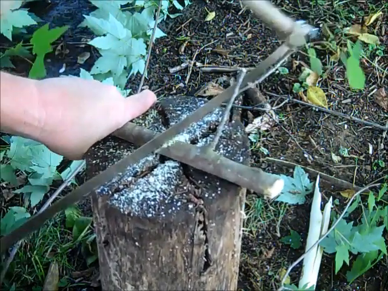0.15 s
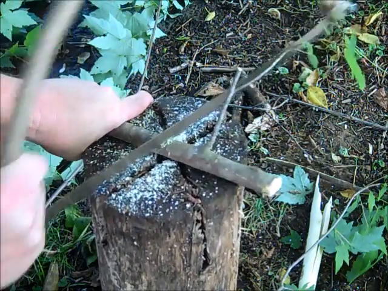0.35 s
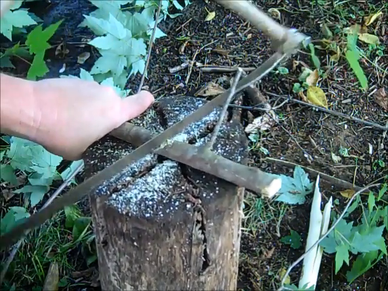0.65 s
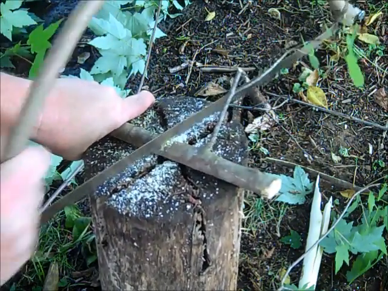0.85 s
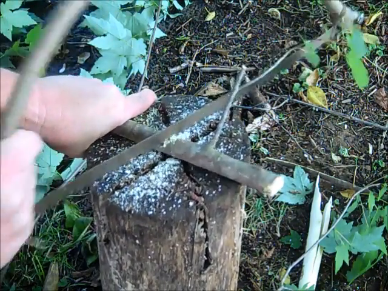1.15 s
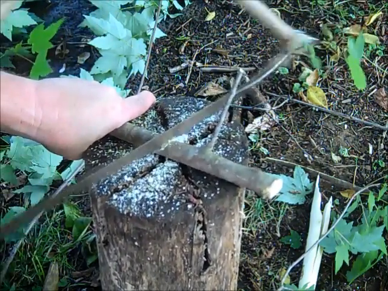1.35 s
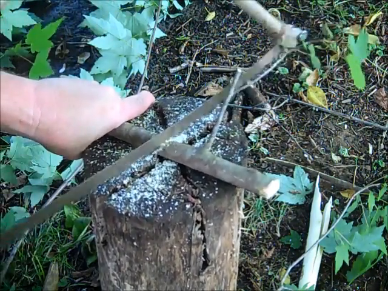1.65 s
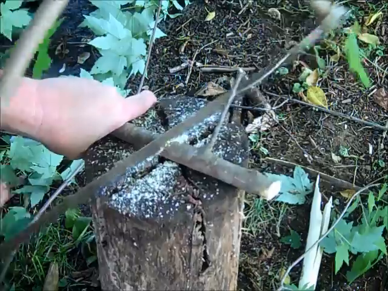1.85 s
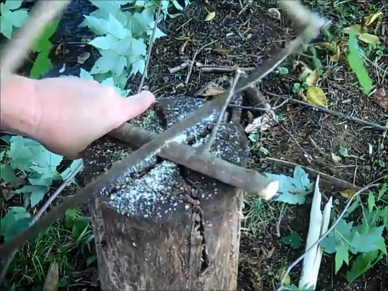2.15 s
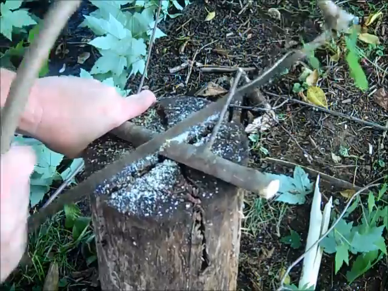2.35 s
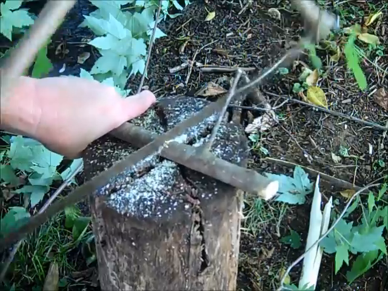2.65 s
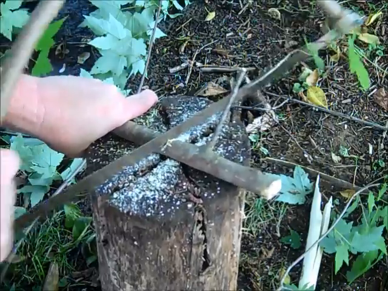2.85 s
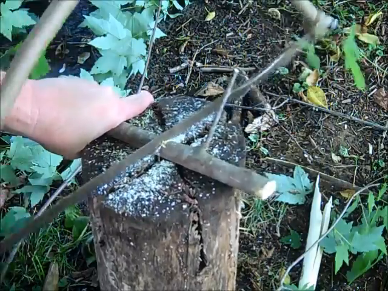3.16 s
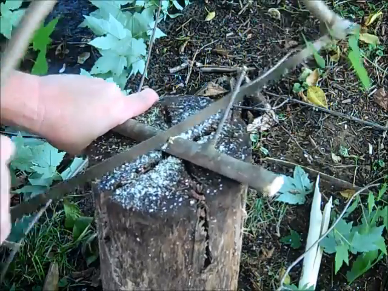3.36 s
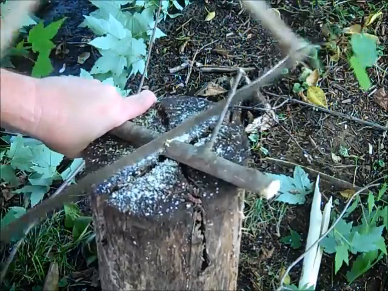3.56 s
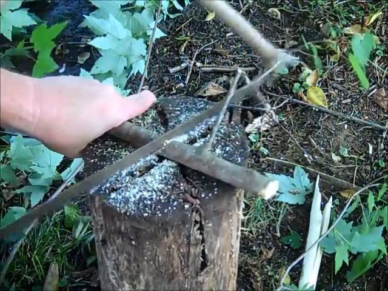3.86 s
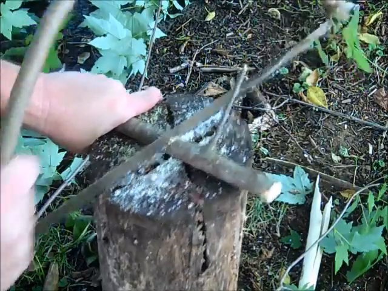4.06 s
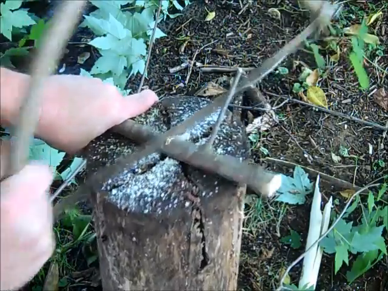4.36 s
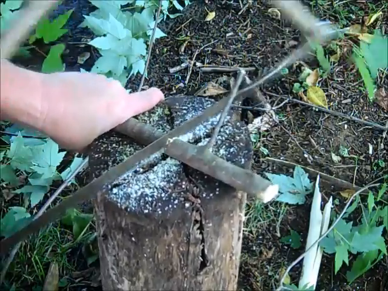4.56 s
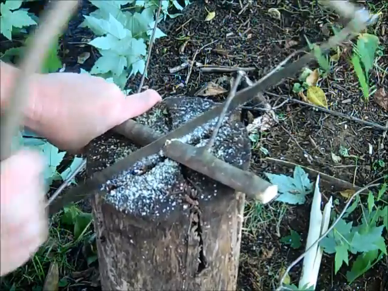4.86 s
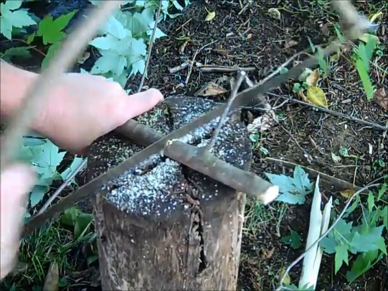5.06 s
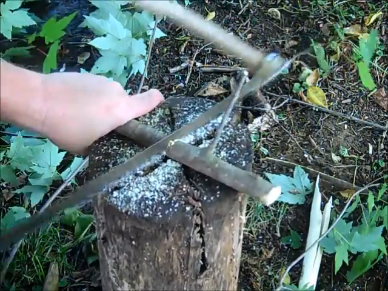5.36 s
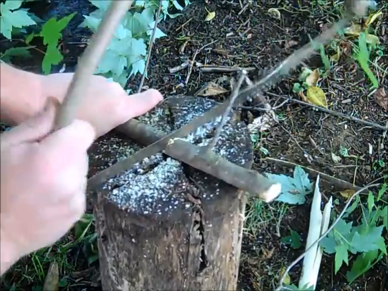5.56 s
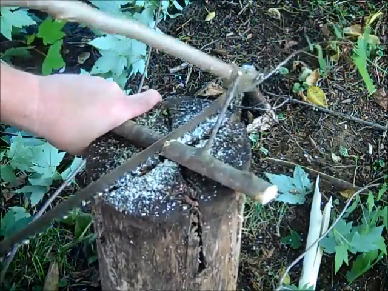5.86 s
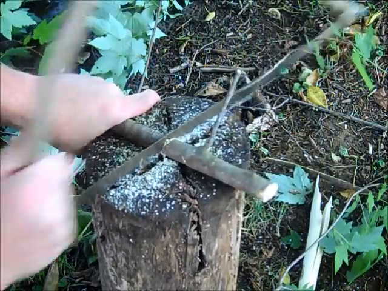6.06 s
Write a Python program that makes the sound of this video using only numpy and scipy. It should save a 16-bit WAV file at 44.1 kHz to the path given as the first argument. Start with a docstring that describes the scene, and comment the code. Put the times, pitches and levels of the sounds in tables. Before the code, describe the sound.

A hand bow saw cuts a stick held on a stump, recorded at arm's length in stereo. Quiet, short pulls alternate with louder, swelling pushes, all crisp, gritty and fibrous. The stick honks nasally, the stump adds faint low body, and small hollow knocks and a faint steel ring come through. Strokes quicken and strengthen, then slow and lengthen towards the end. Outdoors, almost dry, with very quiet air.

```python
"""Outdoors, a bow saw cuts a stick held down on a stump, an arm's length from a pair of microphones.
Light pulls alternate with heavy pushes. Teeth tear crackling fibres out of shaped noise, some biting deep;
the same force makes the stick honk, the stump resonate and the steel blade ring faintly through the turns.
The stick also knocks on the stump and the blade squeaks, as short decaying or swelling notes.
Behind it lie a thin scattered tail and still air, made of noise."""
import sys
import numpy as np
from scipy import signal
from scipy.fft import rfft, irfft, next_fast_len
from scipy.io import wavfile
from scipy.ndimage import uniform_filter1d, map_coordinates

SR = 44100
rng = np.random.default_rng(int(sys.argv[2]) if len(sys.argv) > 2 else 0)


def bounce(signal):
    """Save signal as a 16-bit WAV file at the path given by the first command-line argument."""
    frames = np.transpose(np.atleast_2d(signal))
    limited = np.clip(frames, -1, 1)
    pcm = np.round(limited * 32767).astype(np.int16)
    wavfile.write(sys.argv[1], SR, pcm)


N = 273420

# Resonances of the loose stick. Each row: centre in Hz, width in Hz, relative level in dB.
STICK_LOOSE = [(1241, 98, 21), (1330, 660, -31)]
# Resonances of the stick against the stump. Each row: centre in Hz, width in Hz, relative level in dB.
STUMP_MODES = [(257, 64, 2), (345, 87, 1.5), (516, 68, -2), (877, 130, -3)]
TOP_HZ = 14230  # upper limit of the rasp and of the microphone signal


def amp(db):
    """Decibels to gain."""
    return 10 ** (np.asarray(db) / 20)


def unit(x):
    """x at rms 1."""
    return x / np.sqrt(np.mean(np.abs(x) ** 2) + 1e-20)


def along(points, hz):
    """Rows of (Hz, value) read on a log frequency axis."""
    f, v = np.transpose(points)
    return np.interp(np.log(hz + 1), np.log(f + 1), v)


def filtered(x, response):
    """x times a complex response of frequency."""
    m = next_fast_len(N + SR // 2)
    spectrum = rfft(x, m) * response(np.fft.rfftfreq(m, 1 / SR))
    return irfft(spectrum, m)[..., :N]


def resonate(x, modes):
    """x through resonances of alternating sign, keeping the power of white noise."""
    def response(f):
        total = 0
        for k, (centre, width, db) in enumerate(modes):
            damping = 1j * f * width
            total = total + (-1) ** k * amp(db) * damping / (centre * centre - f * f + damping)
        return unit(total)
    return filtered(x, response)


def wobble(rate):
    """A smooth random curve, rate knots a second."""
    knots = rng.standard_normal(int(N * rate / SR) + 4)
    return map_coordinates(knots, [np.arange(N) * rate / SR])


def noise_pair(patchy_db):
    """White noise as two microphones hear it, partly alike, with drifting patches of colour; rms 1."""
    # Likeness of the two microphones. Each row: frequency in Hz, likeness 0-1.
    likeness = [(100, 0.92), (280, 0.97), (550, 0.86), (1200, 1), (2000, 0.97), (3300, 0.88), (5500, 0.95),
                (9000, 0.6), (14000, 0.2)]
    z = signal.stft(rng.standard_normal((2, N)), nperseg=512)[2]
    field = uniform_filter1d(rng.standard_normal(z.shape[1:]), size=5, axis=0)
    field = uniform_filter1d(field, size=7, axis=1)
    pair = signal.istft(z * amp(patchy_db * unit(field)), nperseg=512)[1][:, :N]

    def mid_and_side(hz):
        angle = np.arccos(np.clip(along(likeness, hz), 0, 1)) / 2
        return np.array([np.cos(angle), np.sin(angle)])
    mid, side = filtered(pair, mid_and_side)
    return unit(np.array([mid + side, mid - side]))


def saw():
    """One cutting force drives the rasp, the stick and the stump; the rasp in turn rings the blade."""
    # Colour of tearing wood. Each row: frequency in Hz, relative density in dB per Hz.
    wood = [(150, -28), (700, -30.5), (1100, -13), (1750, -5.5), (2000, -13.5), (2400, -4.5), (2680, -7),
            (3150, -0.5), (3900, -6), (4550, 2), (5450, -2.5), (5900, 0), (8400, -2), (10200, -14),
            (11700, -10.5), (14300, -19)]
    # Resonances of the pressed stick. Each row: centre in Hz, width in Hz, relative level in dB.
    stick_pressed = [(1222, 136, -5.5), (1485, 165, 0.1), (1586, 118, 0)]
    speed, pressure, rasp_level, stick_level = motion()
    deep, free = bites()
    grip = free * teeth(speed, slow_rate=70, added_rate=90, scatter_db=5.0, tear_s=0.005, rub=0.9)
    cutting = np.hypot(rasp_level * grip, amp(-13) * deep)
    fibres = cutting * crackle(grain_db=1.13, patchy_db=2.5)
    rasp = filtered(fibres, lambda hz: unit(amp(along(wood, hz)) * (hz < TOP_HZ)))
    stick_force = np.hypot(stick_level * grip, amp(-26.5) * deep)
    shaking = stick_force * crackle(grain_db=1.14, patchy_db=0.8)
    # pressure stiffens the stick's seat: its sound moves from the loose to the pressed resonances
    loose = resonate(shaking * np.sqrt(1 - pressure ** 2), STICK_LOOSE)
    pressed = resonate(shaking * pressure, stick_pressed)
    stump = amp(-24.5 + 1.3 * pressure) * resonate(cutting * noise_pair(patchy_db=1.9), STUMP_MODES)
    return rasp + amp(-2.2) * loose + amp(-1.9) * pressed + stump + blade(rasp)


def motion(judder_db=1.26, skip_s=0.011, turn_db=-55, turn_stick_db=-66):
    """Blade speed, pressure on the stick 0-1, levels of rasp and stick; a faint scrape stays in the turns."""
    # Light strokes, the saw drawn back. Each row: start in seconds, end in seconds,
    # moment of top speed as a fraction of the stroke, rasp at top speed in dB, stick against rasp in dB.
    pulls = [(0.001, 0.177, 0.39, -35, -7), (0.435, 0.604, 0.6, -36.5, -6.5),
             (0.841, 0.98, 0.56, -30, -5.5), (1.168, 1.309, 0.62, -34.5, -7),
             (1.512, 1.633, 0.52, -35, -8.5), (1.818, 1.934, 0.48, -32, -7),
             (2.064, 2.201, 0.86, -33.5, -8.5), (2.344, 2.468, 0.66, -33.0, -6.5),
             (2.598, 2.719, 0.73, -31.5, -6.0), (2.848, 2.967, 0.73, -33.5, -7),
             (3.093, 3.225, 0.72, -33.0, -9.5), (3.386, 3.496, 0.69, -30.5, -6.5),
             (3.659, 3.821, 0.74, -32.5, -7), (4.05, 4.201, 0.66, -30.5, -8.5),
             (4.461, 4.638, 0.54, -33.5, -6), (4.973, 5.235, 0.69, -31.5, -5.5),
             (5.59, 5.842, 0.7, -33, -3), (6.184, 6.43, 0.65, -33.5, -10)]
    # Heavy strokes, the saw driven forward. Each row: start in seconds, end in seconds,
    # moment of top speed as a fraction of the stroke, rasp at top speed in dB, stick against rasp in dB.
    pushes = [(0.216, 0.378, 0.77, -26.5, -7.5), (0.628, 0.792, 0.74, -28.5, -10),
              (0.998, 1.127, 0.73, -24.5, -8.5), (1.34, 1.468, 0.54, -27.0, -6.5),
              (1.658, 1.773, 0.59, -25.5, -7), (1.941, 2.053, 0.76, -22.0, -7),
              (2.216, 2.33, 0.62, -24.5, -5.5), (2.473, 2.584, 0.66, -24.0, -5.5),
              (2.732, 2.838, 0.68, -23.0, -5), (2.979, 3.086, 0.66, -23, -7),
              (3.233, 3.344, 0.53, -25.5, -4), (3.511, 3.642, 0.67, -23, -7),
              (3.851, 3.981, 0.64, -21.5, -6.0), (4.246, 4.395, 0.71, -21, -5.0),
              (4.712, 4.926, 0.53, -27, -6.0), (5.294, 5.543, 0.69, -24.5, -5),
              (5.881, 6.106, 0.72, -24.5, -6)]
    # The teeth lose their hold for an instant. Each row: moment in seconds, drop in dB.
    skips = [(0.023, 9), (0.091, 4), (0.344, 14), (0.861, 7), (0.913, 3.5), (1.398, 2.5), (3.54, 5.5),
             (3.682, 9), (4.372, 15), (5.401, 6.5), (5.515, 14), (5.611, 9)]
    t = np.arange(N) / SR
    pull_speed, _, pull_rasp, pull_stick = strokes(
        pulls, swell_db=6.5, steepen=1.0, attack_s=.013, release_s=0.0055)
    push_speed, effort, push_rasp, push_stick = strokes(
        pushes, swell_db=11.5, steepen=0.59, attack_s=0.019, release_s=0.0074)
    drops = sum(db * np.exp(-((t - s) / skip_s) ** 2) for s, db in skips)
    hold = amp(judder_db * wobble(55) - drops)
    rasp = np.hypot(hold * (pull_rasp + push_rasp), amp(turn_db))
    stick = np.hypot(hold * (pull_stick + push_stick), amp(turn_stick_db))
    return pull_speed + push_speed, np.clip(effort, 0, 1), rasp, stick


def strokes(rows, swell_db, steepen, attack_s, release_s, brisk_s=.15, bear_down=0.96):
    """Teeth catch, grow louder with blade speed and let go; shorter strokes press harder, swell more steeply."""
    t = np.arange(N) / SR
    speed, effort, rasp, stick = np.zeros((4, N))
    for start, end, crest, rasp_db, stick_db in rows:
        briskness = brisk_s / (end - start)
        progress = np.clip((t - start) / (end - start), 0, 1)
        warp = np.log(.5) / np.log(np.clip(crest, .1, .9))  # puts the top speed at crest
        swing = np.sin(np.pi * progress ** warp)
        contact = np.clip((t - start) / attack_s, 0, 1) * np.exp(-np.maximum(t - end, 0) / release_s)
        level = contact * amp(rasp_db + swell_db * briskness ** steepen * (swing - 1))
        speed += swing
        effort += bear_down * np.sqrt(np.abs(swing) * briskness)
        rasp += level
        stick += level * amp(stick_db)
    return speed, effort, rasp, stick


def teeth(speed, slow_rate, added_rate, scatter_db, tear_s, rub):
    """Teeth enter the cut faster in mid-stroke, each with its own strength, over steady rubbing; rms 1."""
    rate = (slow_rate + added_rate * speed) * amp(2.2 * wobble(60))  # teeth a second
    passed = np.cumsum(rate) / SR
    times = np.flatnonzero(np.diff(np.floor(passed))) / SR
    force = np.full(N, rub, float)
    for s, (strength, length) in zip(times, rng.standard_normal((len(times), 2))):
        where, shape = tear(s, tear_s * amp(2.76 * length), rise=tear_s / 2, fall=tear_s / 3)
        force[where] += amp(scatter_db * np.tanh(strength)) * shape
    return unit(force)


def bites(stall=0.19, stall_s=0.0055, edge_s=0.0021):
    """Teeth dig in and rip out chips: their force, and the free run 0-1 that dips as each stalls the blade."""
    # Teeth that bite deep. Each row: start in seconds, relative force in dB, length in seconds.
    deep_bites = [(0.108, -17, 0.01), (0.266, -14.5, 0.012), (0.309, -11, 0.012), (0.469, -15, 0.01),
                  (0.529, -16.5, 0.016), (0.682, -14.5, 0.022), (0.719, -10.0, 0.0095),
                  (0.771, -12.5, 0.011), (1.047, -11.5, 0.018), (1.104, -10.5, 0.011),
                  (1.224, -13.5, 0.011), (1.273, -16.5, 0.013), (1.358, -14.5, 0.023), (1.408, -7.5, 0.006),
                  (1.422, -7, 0.0064), (1.54, -16.5, 0.013), (1.588, -10.5, 0.0093), (1.745, -10.5, 0.018),
                  (1.885, -13, 0.0063), (1.965, -15.5, 0.015), (2.135, -11, 0.012), (2.148, -16.5, 0.0091),
                  (2.384, -15, 0.0056), (2.408, -16.5, 0.015), (2.497, -12.5, 0.0075),
                  (2.535, -6.5, 0.0078), (2.657, -13.5, 0.0083), (2.766, -10.5, 0.0077),
                  (2.89, -10, 0.0036), (2.9, -13, 0.0056), (2.921, -12, 0.012), (3.167, -15.5, 0.012),
                  (3.313, -9.5, 0.017), (3.451, -6.5, 0.0061), (3.549, -16, 0.007), (3.733, -13, 0.013),
                  (4.114, -12, 0.011), (4.338, -12, 0.006), (4.369, -9.0, 0.008), (4.589, -17, 0.0074),
                  (4.836, -6, 0.0054), (5.045, -14, 0.008), (5.074, -14, 0.0074), (5.105, -12, 0.01),
                  (5.377, -6, 0.0085), (5.414, -8, 0.0094), (5.441, -8, 0.0041), (5.669, -15, 0.012),
                  (5.706, -8.5, 0.0079), (5.74, -7, 0.006), (5.932, -11, 0.009), (5.963, -6.5, 0.0086),
                  (5.973, -4.5, 0.0068), (5.993, -11, 0.019), (6.088, -14, 0.012)]
    force, free, t = np.zeros(N), np.ones(N), np.arange(N) / SR
    for s, db, length in deep_bites:
        where, shape = tear(s, max(length, .002), rise=edge_s, fall=edge_s)
        force[where] += amp(db) * shape
        near = slice(max(where.start - SR // 32, 0), where.stop)
        # the dip is deepest just before the bite
        free[near] *= 1 - min(stall, 1) * np.exp(-((t[near] - s) / stall_s + .5) ** 2)
    return force, free


def tear(s, length, rise, fall):
    """Force of one tooth: it catches at s, strains the fibres toward a limit for length, and lets go."""
    age = np.arange(SR // 16) / SR
    shape = (1 - np.exp(-age / rise)) * np.exp(-np.maximum(age - length, 0) / fall)
    start = int(np.clip(s * SR, 0, N - 1))
    return slice(start, start + len(age)), shape[:N - start]


def crackle(grain_db, patchy_db, snap_rate=260, snap_size=0.74, snap_s=0.00043):
    """Fibres part in dense clumps of uneven size; here and there a thick one snaps with a sharp tick."""
    snaps = (rng.random(N) < snap_rate / SR) * rng.uniform(0.46, 1, N) * snap_size
    ticks = signal.lfilter([1], [1, -np.exp(-1 / (snap_s * SR))], snaps)
    return unit(noise_pair(patchy_db) * (amp(grain_db * wobble(1800)) + ticks))


def blade(rasp):
    """The taut steel, driven by the rasp, keeps ringing faintly in decaying sine modes."""
    # Ringing of the blade. Each row: pitch in Hz, relative level in dB, time to fall 60 dB in seconds.
    blade_modes = [(1200, -4, .22), (2510, -7, .22), (3220, -8, .1), (4520, 0, .1), (4780, -5, .1),
                   (5930, -5, .1), (6225, -2, .13), (6640, -4, .13), (7170, -2, .13), (11580, -6, .05),
                   (12480, -8, .05)]
    t = np.arange(SR // 2) / SR
    phases = rng.uniform(0, 2 * np.pi, (len(blade_modes), 2, 1))
    ring = np.zeros((2, len(t)))
    for (hz, db, t60), phase in zip(blade_modes, phases):
        ring += amp(db - 60 * t / t60) * np.sin(2 * np.pi * hz * t + phase)
    return amp(-19) * signal.fftconvolve(rasp, ring / np.linalg.norm(ring[0]), axes=1)[:, :N]


def knocks(t60=0.037, rise=0.0024, sag=0.1, rattle=0.37):
    """The stick rocks against the stump with a short, rough, hollow note that sags in pitch."""
    # Each row: start in seconds, relative level in dB, pitch midway through the sag in Hz.
    rocks = [(0.299, -39, 314), (1.086, -40, 290), (1.226, -38.5, 228), (1.275, -38, 218),
             (1.417, -38.5, 302.4), (2.007, -33, 400), (2.539, -30.5, 265), (3.284, -45, 309.6),
             (3.311, -29.5, 365), (3.579, -26, 285), (3.604, -30, 237), (3.966, -26, 338.5),
             (4.974, -29.5, 386), (4.987, -27.5, 356), (5.707, -35, 242.6), (6.026, -36, 324.3)]
    out, t = np.zeros(N + SR), np.arange(SR // 8) / SR
    chatter = unit(resonate(rng.standard_normal(N), STUMP_MODES + STICK_LOOSE))
    for s, db, hz in rocks:
        start = round(s * SR)
        pitch = hz * (1 + sag * (.5 - np.minimum(t / 0.02, 1)))  # sags for 20 ms
        phase = 2 * np.pi * np.cumsum(pitch) / SR
        note = np.sin(phase) + rattle * chatter[start:][:len(t)]
        out[start:][:len(t)] += amp(db + 2.5 - 60 * t / t60) * (1 - np.exp(-t / rise)) * note
    return out[:N]


def squeaks(swell_s=0.015):
    """The blade rubs the side of the cut as it turns round and sings one brief, swelling sine note."""
    # Each row: start in seconds, peak level in dB, pitch in Hz.
    songs = [(.405, -57, 6250), (.59, -54, 2530), (.98, -52, 2537), (3.64, -46, 2540), (4.006, -52, 1248),
             (6.079, -35, 1196)]
    out, t = np.zeros(N + SR), np.arange(SR // 8) / SR
    swell = (t / swell_s * np.exp(1 - t / swell_s)) ** 2
    for s, db, hz in songs:
        out[round(s * SR):][:len(t)] += amp(db) * swell * np.sin(2 * np.pi * hz * t)
    return out[:N]


def garden(x, t60=0.33):
    """Ground and foliage scatter a thin, short tail: x convolved with decaying noise."""
    t = np.arange(SR // 3) / SR
    tail = rng.standard_normal((2, len(t))) * amp(-60 * t / t60) * (1 - np.exp(-t / 0.001))
    return signal.fftconvolve(x, tail / np.linalg.norm(tail[0]), axes=1)[:, :N]


def still_air():
    """Still garden air: steady noise, strongest in the bass, at rms 1."""
    # Each row: frequency in Hz, relative density in dB per Hz.
    air_colour = [(25, -34), (45, -17), (65, -2), (115, 0.5), (170, -3), (250, -5), (600, -10), (2000, -15),
                  (8000, -35), (14000, -80)]
    return unit(filtered(noise_pair(patchy_db=2.8), lambda hz: amp(along(air_colour, hz))))


def scene():
    """The saw and the stick in quiet open air."""
    work = saw() + knocks() + squeaks()
    air = still_air()
    return work + amp(-21.0) * garden(work) + amp(-56.5) * air


def record(dry, ceiling=0.46):
    """Two microphones differ most in the treble; the tallest peaks are rounded off and the band limited."""
    # Shading of the right microphone. Each row: frequency in Hz, left minus right in dB.
    shading = [(100, 0.5), (1300, 1), (4000, -0.5), (5400, 0.5), (5900, -8), (6900, 3.5), (7600, 7.5),
               (8500, 16), (11500, 8), (12500, 30), (13500, 23)]
    # Phase by which the left microphone leads. Each row: frequency in Hz, lead in radians.
    left_lead = [(4000, 0.2161), (6000, -0.63), (7400, 0.96), (8900, 0.1), (11500, -2.5), (13100, 8)]

    def microphones(hz):
        ratio = amp(along(shading, hz))
        return np.array([2 * ratio, 2 * np.exp(-1j * along(left_lead, hz))]) / (1 + ratio)
    heard = filtered(dry, microphones)
    rounded = heard / (1 + (heard / ceiling) ** 4) ** (1 / 4)
    return filtered(rounded, lambda hz: hz < TOP_HZ)


dry = scene()
out = record(dry)
bounce(out)
```